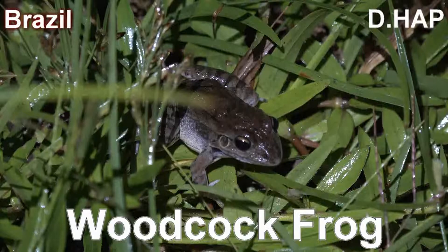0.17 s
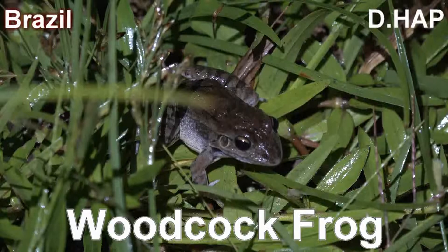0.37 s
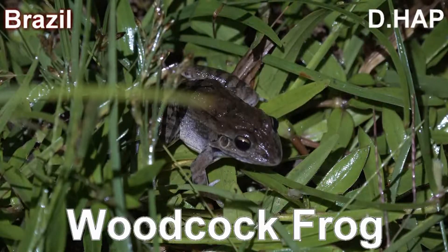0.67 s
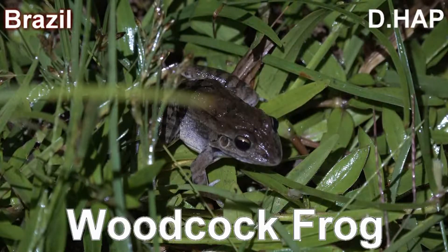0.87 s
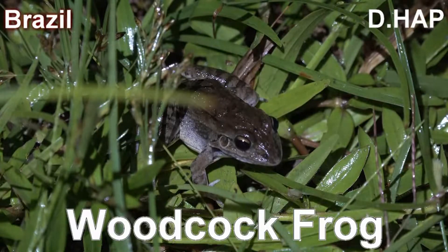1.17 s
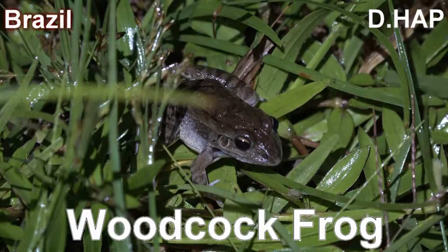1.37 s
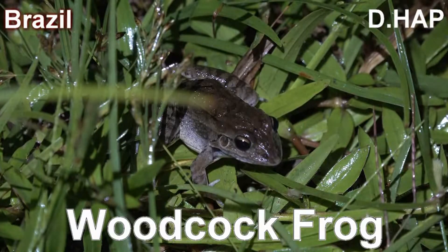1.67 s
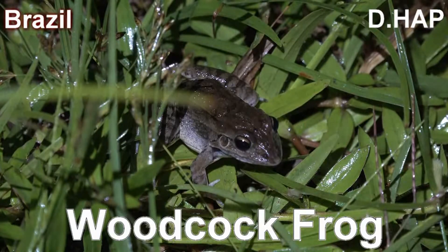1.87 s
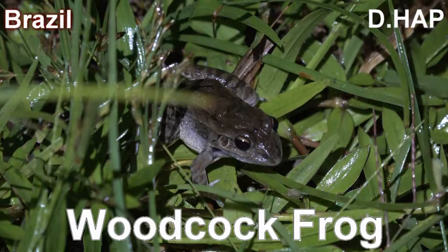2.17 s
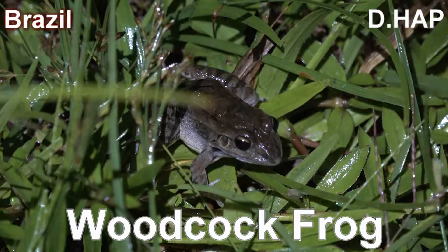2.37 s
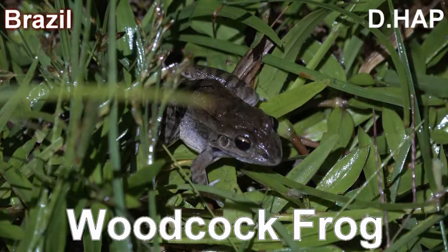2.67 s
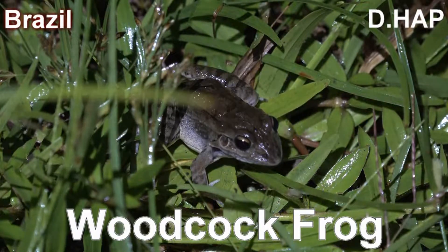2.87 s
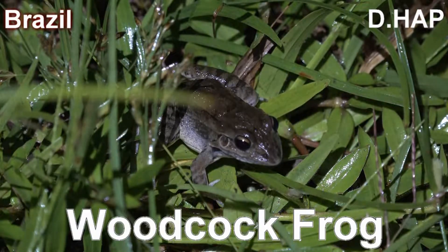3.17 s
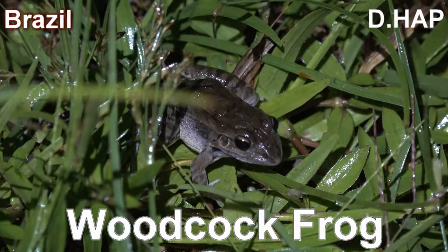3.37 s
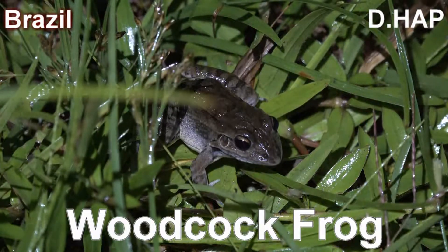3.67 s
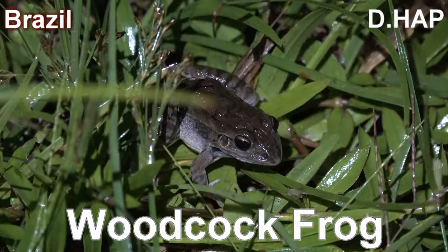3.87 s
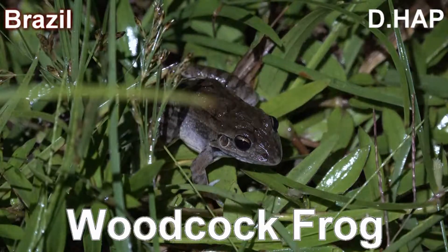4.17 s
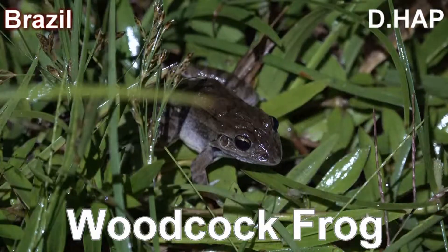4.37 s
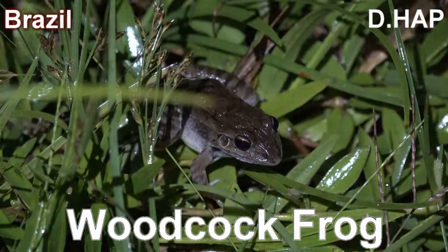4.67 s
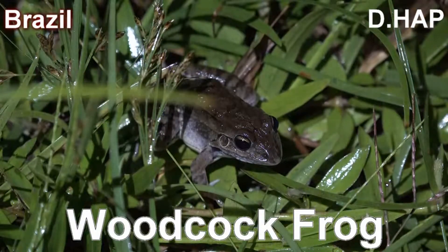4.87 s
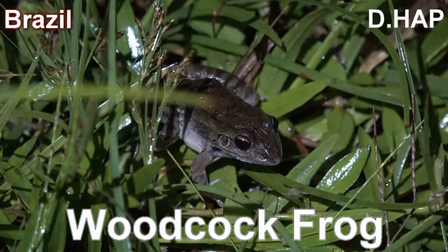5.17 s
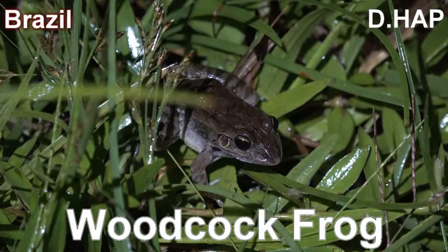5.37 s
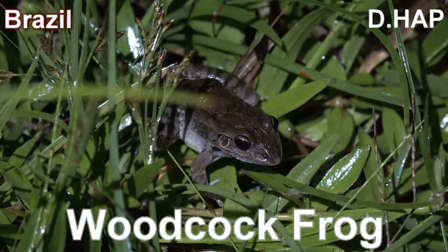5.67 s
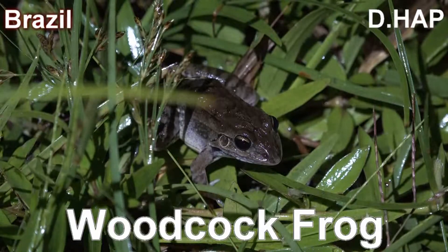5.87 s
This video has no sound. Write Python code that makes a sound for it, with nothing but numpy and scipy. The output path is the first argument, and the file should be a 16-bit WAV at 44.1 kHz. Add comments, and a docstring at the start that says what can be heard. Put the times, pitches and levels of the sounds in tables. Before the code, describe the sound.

Two quick upward frog whistles poke through a steady shimmering wall of crickets and katydids in night grass, with faint frogs far behind.

```python
"""Frog and insects in night grass

A frog, a little right of centre in stereo, gives two short rising whistles: swept sines notched by the ground.
Crickets trill in phrases and chirp as tone bursts; a bush cricket buzzes as a comb of overtones.
Two katydids rasp as gated noise; far frogs, a hoarse call and soft hoots are resonances driven by noise.
Behind them lie far crickets, a traffic murmur, mains hum and the hiss of the night."""
import sys
import numpy as np
from scipy import signal
from scipy.fft import rfft, irfft, next_fast_len
from scipy.io import wavfile

SR = 44100
rng = np.random.default_rng(int(sys.argv[2]) if len(sys.argv) > 2 else 0)


def bounce(signal):
    """Save signal as a 16-bit WAV file at the path given by the first command-line argument."""
    frames = np.transpose(np.atleast_2d(signal))
    limited = np.clip(frames, -1, 1)
    pcm = np.round(limited * 32767).astype(np.int16)
    wavfile.write(sys.argv[1], SR, pcm)


def attenuation_scalar(level_db):
    """Turn a level in dB into a linear amplitude multiplier (20 dB per decade)."""
    decades = np.asarray(level_db, float) / 20
    return 10 ** decades


N = 265923
PADDED = next_fast_len(N)  # length of the long transforms


def evened(x):
    """Normalisation: scales to rms 1."""
    return x / np.sqrt(np.mean(x ** 2) + 1e-20)


def curve(rows):
    """Linear interpolation: the columns after t, read at every sample."""
    s, *columns = np.transpose(rows)
    return [np.interp(np.arange(N) / SR, s, c) for c in columns]


def sine(hz):
    """Frequency modulation: phase is the running sum of frequency; peak 1."""
    return np.sin(2 * np.pi * np.cumsum(hz) / SR)


def wander(top_hz, count=24):
    """Slow fluctuation: a sum of sines of random phase, up to top_hz, rms 1."""
    t = np.arange(0, N + 256, 256) / SR
    rates = np.geomspace(top_hz / 20, top_hz, count)
    slow = sum(np.sin(2 * np.pi * (f * t + rng.random())) / np.sqrt(f) for f in rates)
    return np.interp(np.arange(N) / SR, t, evened(slow))


def resonate(x, hz, width):
    """Resonance: a double pole; for a moving one, hz is shifted to zero, smoothed twice and shifted back."""
    r = np.exp(-np.pi * width / SR)
    if np.isscalar(hz):
        pole = r * np.exp(2j * np.pi * hz / SR)
        return 2 * signal.lfilter([(1 - r) ** 2], [1, -2 * pole, pole * pole], x).real
    turn = np.exp(2j * np.pi * np.cumsum(hz) / SR)
    smooth = signal.lfilter([(1 - r) ** 2], [1, -2 * r, r * r], x * turn.conj())
    return 2 * (turn * smooth).real


def pair(same):
    """Interchannel coherence: two channels of noise with the correlation given."""
    a, b = rng.standard_normal((2, N))
    same = np.clip(same, -1, 1)
    return np.array([a, same * a + np.sqrt(1 - same ** 2) * b])


def coloured(x, points, lag=0.):
    """Spectral filtering: multiplies by the curve of points; the right channel arrives lag ms later."""
    hz = np.fft.rfftfreq(PADDED, 1 / SR)
    f, db = np.transpose(points)
    gain = attenuation_scalar(np.interp(np.log(hz + 1), np.log(f), db, left=-90, right=-90))
    late = np.exp(-2j * np.pi * hz * np.array([[0], [lag / 1000]]))
    return irfft(rfft(x, PADDED) * gain * late, PADDED)[:, :N]


def scatter(x, t60, same):
    """Multiple scattering by leaves and ground: convolution with a dying noise tail, left energy 1."""
    t = np.arange(round(SR * .4)) / SR
    tail = pair(same)[:, :len(t)] * attenuation_scalar(-60 * t / t60) * (t > .004)
    return signal.fftconvolve(x[None], tail / np.linalg.norm(tail[0]), axes=1)[:, :N]


def bouts(rows, rise_db_per_s, drift_db_per_s, fall_db_per_s, rest_db):
    """Exponential envelope: gain climbs to each row's level, drifts while it lasts and falls to rest."""
    t, db = np.arange(0, N + 64, 64) / SR, rest_db
    for start, stop, top_db in rows:
        rise = rise_db_per_s * np.minimum(t - start, 0)
        drift = drift_db_per_s * (np.clip(t, start, stop) - start)
        fall = fall_db_per_s * np.maximum(t - stop, 0)
        db = np.maximum(db, top_db + rise + drift - fall)
    return np.interp(np.arange(N) / SR, t, attenuation_scalar(db))


def between(start, stop, edge_s):
    """Gating: 0 outside the span, 1 inside, with linear edges centred on its ends."""
    t = np.arange(N) / SR
    return np.clip(np.minimum(t - start, stop - t) / edge_s + .5, 0, 1)


# the frog's whistles, levels ahead of panning and notches: start t/s, top level/dB
WHISTLES = [(3.698, -32), (4.787, -32)]
# the sweep of every whistle: t/s after its start, f/Hz, level/dB re top
WHISTLE_SWEEP = [(0, 950, -28), (.019, 1050, -23), (.03, 1150, -4.5), (.04, 1325, -3.5), (.047, 1515, -4),
                 (.057, 1665, -3.5), (.07, 1835, 0), (.088, 2110, -3), (.096, 2280, -18), (.106, 2400, -25)]
# notches where the ground reflection cancels the frog: f/Hz, width/Hz,
# share of the band subtracted left, right (1 cancels, more inverts)
GROUND_NOTCHES = [(1400, 70, 1.25, 1.25), (2010, 90, .8, .5)]


def frog():
    """Interference: a rising sine notched by its ground reflection, with one late echo and a faint tail."""
    t, voice = np.arange(N) / SR, np.zeros(N)
    for start, top_db in WHISTLES:
        hz, db = curve(np.add(WHISTLE_SWEEP, (start, 0, top_db)))
        sounding = (t > start) & (t < start + WHISTLE_SWEEP[-1][0])
        voice += np.sqrt(2) * attenuation_scalar(db) * sounding * sine(hz * sounding)
    near = np.array([voice, np.roll(voice, 2)])  # the right channel lags by two samples
    for hz, width, left, right in GROUND_NOTCHES:
        band = signal.lfilter(*signal.iirpeak(hz, hz / width, SR), near)
        near = near - np.array([[left], [right]]) * band
    echo = attenuation_scalar(-30) * np.roll(voice, round(.05 * SR))
    return near * attenuation_scalar([[-1.8], [1.6]]) + echo + attenuation_scalar(-21) * scatter(voice, 0.55, 0.47)


# phrases of the trilling cricket, levels ahead of the direct and scattered mix:
# start t/s, full pitch t/s, stop t/s, level/dB
TRILL_PHRASES = [(-.75, -.4, .27, -37), (1.06, 1.41, 2.095, -38.5), (2.772, 3.08, 3.77, -37.5),
                 (4.516, 4.8, 5.455, -38.5)]
TRILL_RATE = 49.3  # pulses per second
TRILL_LOW_HZ, TRILL_TOP_HZ, SLIDE_BEND = 5430, 5905, 1.15  # slide of the mean pitch; exponent of its curve
SWELL_DB = -8.5  # at the start of a phrase, re its full level
AFTER_HZ, AFTER_DB, AFTER_DB_PER_S = 5852, -5.5, -18  # lingering shimmer: pitch, level re phrase, decay


def trill():
    """Stridulation: each wing stroke is a tone burst falling in pitch; scattering in the grass smears it."""
    t, (hz, gain, beat, after) = np.arange(N) / SR, np.zeros((4, N))
    for start, full, stop, db in TRILL_PHRASES:
        on = t >= start
        slide = np.clip((t - start) / (full - start), 0, 1) ** SLIDE_BEND
        hz[on] = (TRILL_LOW_HZ + (TRILL_TOP_HZ - TRILL_LOW_HZ) * slide)[on]
        beat[on] = TRILL_RATE * (t[on] - start)
        gain += attenuation_scalar(db + SWELL_DB * (1 - slide)) * between(start, stop, 0.011)
        decay_db = AFTER_DB_PER_S * np.maximum(t - stop, 0)
        after += attenuation_scalar(db + AFTER_DB + decay_db) * between(full, stop + 2, 0.25)
    stroke = np.clip((beat + .04 * wander(6)) % 1 / 0.74, 0, 1)  # the burst fills 0.74 of each period
    gate = np.sin(np.pi * stroke ** 0.55) ** 2
    rough = evened(resonate(rng.standard_normal(N), hz, 520)) * gate
    fall_hz = 460 * (.5 - stroke) * (stroke < 1)
    clean = sine(hz + fall_hz + 20 * wander(30)) * gate
    song = gain * evened(.75 * evened(clean) + .33 * evened(rough))
    shimmer = after * evened(resonate(pair(0.76), AFTER_HZ, 210))
    return .75 * song * attenuation_scalar([[-.5], [.5]]) + .4 * scatter(song, .15, .6) + shimmer


def overtones(rate, orders, fade_db, turn):
    """Fourier series: regular wing strokes are a comb; moving air lets each line fade and shift alone."""
    angle, out = 2 * np.pi * np.cumsum(rate) / SR, np.zeros((2, N))
    for k, db in orders:
        drift = 1.0 * wander(14, count=8) + rng.normal(0, 0.91)
        sides = np.array([[turn], [-turn]]) * rng.uniform(0.48, 1.53)  # phase left, right [rad]
        line_gain = attenuation_scalar(db + fade_db * wander(20, count=8)) * np.sqrt(2)
        out += line_gain * np.cos(round(k) * angle + drift + sides)
    return out


# the bush cricket's buzz: t/s, mean f/Hz of overtone 45 of the wing rate, rms level/dB
BUZZ = [(.15, 7033, -41), (3.0, 7031, -41), (6.05, 7028, -40.5)]
# its overtones: multiple of the wing rate, relative level/dB
BUZZ_ORDERS = [(36, -13), (37, -20), (38, -9), (39, -14), (40, -15), (41, -13), (42, -7), (43, -5), (44, 0),
               (45, 0), (46, -6), (47, -9), (48, -10), (49, -14), (50, -14), (51, -18)]


def bush_cricket():
    """Harmonic comb: a nearly steady wing rate yields high overtones only."""
    hz, db = curve(BUZZ)
    rate = (hz + 4 * wander(4)) / 45
    return attenuation_scalar(db) * evened(overtones(rate, BUZZ_ORDERS, 1.8, .35))


# thin tones of other singers, ahead of their waver and fading: f/Hz, rms level/dB
THIN_TONES = [(6640, -62), (6805, -58), (7120, -65), (7291, -58), (7432, -55), (7596, -59), (7905, -71)]
THIN_WAVER = 6.63  # rms waver of pitch [Hz]


def thin_tones():
    """Random modulation: sines that waver in pitch and level, out of phase between the channels."""
    out = np.zeros((2, N))
    for hz, db in THIN_TONES:
        angle = 2 * np.pi * np.cumsum(hz + THIN_WAVER * wander(10, count=8)) / SR
        gain = attenuation_scalar(db + 5.9 * wander(11, count=8)) * np.sqrt(2)
        out += gain * np.cos(angle + np.array([[.5], [-.5]]))
    return out


# tempo of the katydid at the side, a stroke at every whole number: t/s, strokes so far
SIDE_TEMPO = [(0, .71), (.8, 13.36), (1.05, 17.39), (2.05, 33.84), (2.8, 45.71), (3.3, 53.98),
              (4.05, 65.86), (4.55, 73.42), (4.8, 77.34), (5.05, 81.45), (6.05, 97.17)]
# tempo of the katydid in front: t/s, strokes so far
FRONT_TEMPO = [(0, .47), (1.55, 26.9), (2.3, 39.98), (2.8, 47.56), (4.15, 70.7), (6.05, 102.9)]
# spectrum of the one at the side: f/Hz, relative level/dB
SIDE_RASP = [(6500, -31), (7600, 2.5), (8600, 0.5), (9400, -7.5), (10700, -6.5), (12000, -7.5),
             (13500, -14), (15000, -23), (16000, -43)]
# spectrum of the one in front: f/Hz, relative level/dB
FRONT_RASP = [(6500, -28), (7500, 3), (8900, -1), (10000, -5.5), (11000, -11.5), (12500, -14),
              (15000, -11.5), (16000, -30)]
# spectrum of the far katydids: f/Hz, relative level/dB
FAR_RASP = [(6500, -35), (7600, -15), (8600, 2.5), (9400, 0), (10700, -5), (12000, -8.5), (13500, -8.5),
            (15000, -22), (16000, -10.5)]
# the far katydids, ahead of the common 2 dB lift: t/s, rms level/dB
RASP_BED = [(.15, -43), (.6, -47), (3.0, -44.5), (6.05, -43.5)]


def strokes(tempo):
    """Amplitude modulation: power of a rasp, a Gaussian pulse of varying size at each whole number."""
    count = curve(tempo)[0]
    nearest = np.round(count)
    size = attenuation_scalar(1.2 * rng.standard_normal(200))[nearest.astype(int)]
    offset_s = (count - nearest) / np.gradient(count) / SR
    return size * np.exp(-(offset_s / 0.0097) ** 2)


def katydids():
    """File and scraper: each stroke gates fine broadband clicks over the steady rasp of those far away."""
    side, blur = strokes(SIDE_TEMPO), between(1, 1.94, .15)  # span in which the strokes run together
    side = (1 - blur) * side + blur * side.mean()
    front = strokes(FRONT_TEMPO) * (1 - between(2.33, 2.81, 0.072))  # the one in front rests
    teeth = attenuation_scalar(2.8 * rng.standard_normal((2, N // 20 + 1))).repeat(20, axis=1)[:, :N]
    side_noise = evened(coloured(pair(0.87) * teeth[0], SIDE_RASP, lag=-0.061))
    front_noise = evened(coloured(pair(0.44) * teeth[1], FRONT_RASP))
    aside = attenuation_scalar(-40) * side_noise * np.sqrt(side)
    ahead = attenuation_scalar(-42.5) * front_noise * np.sqrt(front)
    bed = evened(coloured(pair(0.46), FAR_RASP, lag=-0.065)) * attenuation_scalar(curve(RASP_BED)[0])
    return attenuation_scalar(2.0) * (aside * attenuation_scalar([[-.6], [.6]]) + ahead + bed)


# bouts of chirps, levels ahead of a 5 dB cut, panning and chance: first t/s, last t/s, level/dB
CHIRP_BOUTS = [(.653, .941, -44), (3.089, 3.233, -45), (4.508, 4.797, -47)]
CHIRP_GAP_S, CHIRP_HZ = .072, 4875  # spacing; the pitch a chirp approaches


def chirps():
    """Onset transient: short tones start flat and rise exponentially to pitch."""
    t, out = np.arange(round(.039 * SR)) / SR, np.zeros((2, N))
    tone = sine(CHIRP_HZ - 130 * np.exp(-t / .012)) * signal.windows.tukey(len(t), .35)
    pan_db = np.array([[-1.5], [1.5]])
    for first, last, db in CHIRP_BOUTS:
        for s in np.linspace(first, last, round((last - first) / CHIRP_GAP_S) + 1):
            out[:, round(s * SR):][:, :len(t)] += attenuation_scalar(db - 5.0 + 1.1 * rng.normal() + pan_db) * tone
    return out + 0.11 * scatter(out.mean(0), 0.085, 0.36)


# the same kind of frog further off, levels ahead of the direct and scattered mix:
# t/s, length/s, first f/Hz, highest f/Hz, level/dB
FAR_WHISTLES = [(.585, .14, 1700, 2240, -55.5), (4.62, .12, 1900, 2450, -60), (5.3, .16, 2150, 2450, -59)]
FAR_ARCH = .74  # share of a half turn that a far whistle's pitch runs through


def far_whistles():
    """Diffuse propagation: arched whistles blurred by scattering almost as strong as the direct sound."""
    t, voice = np.arange(N) / SR, np.zeros(N)
    for s, length, first_hz, top_hz, db in FAR_WHISTLES:
        u = np.clip((t - s) / length, 0, 1)
        hz = first_hz + (top_hz - first_hz) * np.sin(np.pi * FAR_ARCH * u)
        voice += attenuation_scalar(db) * np.sqrt(np.abs(np.sin(np.pi * u))) * (u < 1) * sine(hz)
    return 0.85 * voice + 0.79 * scatter(voice, 0.19, 0.89)


# bouts of the far chorus: full from t/s, until t/s, level/dB at the start
CHORUS = [(.1, .35, -59), (1.2, 2.12, -59.5), (2.95, 3.75, -58.5), (4.41, 5.15, -58), (5.3, 6.1, -59)]
# resonances of its throats: f/Hz, width/Hz, relative level/dB
CHORUS_THROAT = [(1985, 150, 0), (1860, 170, -5), (2300, 300, -10)]
CROAKS_PER_S, CROAK_DEPTH = 23, .25  # mean rate and depth of the throb
LEAD_HZ, LEAD_SHARE = 2000, .85  # one clearer voice: mean pitch, rms re the rest


def frog_chorus():
    """Source and filter: random croak pulses and noise ring in throats, and the whole throbs."""
    t = np.arange(N) / SR
    pulses = (rng.random(N) < 300 / SR) * rng.standard_normal(N)
    drive = 0.46 * evened(scatter(pulses, 0.17, 0.98)) + .5 * pair(0.63)
    chorus = sum(attenuation_scalar(db) * resonate(drive, hz, width) for hz, width, db in CHORUS_THROAT)
    lead = np.sqrt(2) * sine(LEAD_HZ + 28 * wander(40))
    throb = 1 + CROAK_DEPTH * np.sin(2 * np.pi * (CROAKS_PER_S * t + 0.33 * wander(4)))
    chorus = (evened(chorus) + LEAD_SHARE * lead) * throb
    return bouts(CHORUS, 100, 1.4, 170, -76) * evened(chorus)


# the hoarse far call: full from t/s, until t/s, level/dB at the start
HOARSE = [(2.27, 2.45, -54)]
# resonances of its throat: f/Hz, width/Hz, relative level/dB
HOARSE_THROAT = [(622.6, 30, 2.5), (753, 60, 0), (970, 170, 3), (1128, 130, 3)]


def hoarse_call():
    """Source and filter: noise through the resonances of a rough throat."""
    drive = pair(0.44)
    throat = sum(attenuation_scalar(db) * resonate(drive, hz, width) for hz, width, db in HOARSE_THROAT)
    return bouts(HOARSE, 260, -31, 200, -110) * evened(throat)


# faint low hoots and brief hissy swells: t/s, length/s, f/Hz, width/Hz, rms level/dB at the crest
HOOTS = [(.2, 0.33, 476, 25, -73), (1.37, 0.33, 475, 27, -73), (3.602, 0.38, 474, 24, -72),
         (2.66, 0.16, 4500, 730, -53.5), (4.82, 0.16, 4400, 1300, -49.5)]


def hoots_and_swells():
    """Narrowband noise: resonated noise under a half-sine envelope."""
    t, out = np.arange(N) / SR, np.zeros(N)
    for s, length, hz, width, db in HOOTS:
        swell = np.sin(np.pi * np.clip((t - s) / length, 0, 1))
        out += attenuation_scalar(db) * swell * evened(resonate(rng.standard_normal(N), hz, width))
    return out


# the many far crickets that blur into bands, ahead of a slow shimmer: f/Hz, width/Hz, rms level/dB
FAR_CRICKETS = [(3580, 750, -55), (5475, 55, -57), (5600, 80, -54), (5890, 290, -50.5), (6320, 410, -47.5),
                (6790, 650, -42.5), (7227, 830, -42), (1031, 133, -70.5), (801, 86, -74)]


def far_crickets():
    """Incoherent summation: many singers merge into bands of noise that shimmer slowly."""
    out = np.zeros((2, N))
    for hz, width, db in FAR_CRICKETS:
        shimmer_db = .7 * wander(12)
        out += attenuation_scalar(db + shimmer_db) * evened(resonate(pair(0.75), hz, width))
    return out


# swells of the traffic murmur: full from t/s, until t/s, level/dB at the start
RUMBLE = [(2.0, 2.45, -62.5), (4.45, 5.19, -63)]


def traffic_murmur():
    """Band-limited noise: one broad low resonance that swells and sinks."""
    return bouts(RUMBLE, 70, -4.5, 35, -72.5) * evened(resonate(pair(0.32), 315, 224))


# mains hum, ahead of its waver: f/Hz, rms level/dB
HUM = [(57.5, -72), (118.6, -65), (242.2, -77.5)]


def mains_hum():
    """Additive synthesis: low sines wavering a little in pitch and level."""
    out = np.zeros(N)
    for hz, db in HUM:
        out += attenuation_scalar(db + 0.99 * wander(5)) * np.sqrt(2) * sine(hz + 2.0 * wander(6))
    return out


# coherence of the hiss: f/Hz, left-right correlation (negative is opposed)
HISS_LIKENESS = [(60, 0.81), (92, 0.81), (140, 0.56), (210, 0.49), (330, -0.78), (500, -0.57), (770, -0.78),
                 (1170, -0.37), (1790, -0.12), (2740, 0.83), (4190, 0.85), (6410, 1), (9810, -0.25),
                 (15000, 0.4)]
# spectrum of the hiss: f/Hz, relative level/dB per Hz
HISS_SPECTRUM = [(15, -46), (25, -15), (50, -9), (74, -9.5), (119, -13.5), (169, -11.5), (242, -12),
                 (296, -15), (688, -10), (1370, -14), (1960, -9), (2800, -10.5), (3650, -3.5), (4950, -7),
                 (5150, -10), (6000, -35)]


def night_hiss():
    """Frequency-dependent coherence: shaped noise whose channels agree more or less with pitch."""
    f, same = np.transpose(HISS_LIKENESS)
    log_hz = np.log(np.fft.rfftfreq(PADDED, 1 / SR) + 1)
    same = np.clip(np.interp(log_hz, np.log(f), same), -1, 1)
    a, b = rfft(rng.standard_normal((2, PADDED)))
    noise = irfft(np.array([a, same * a + np.sqrt(1 - same ** 2) * b]), PADDED)
    return attenuation_scalar(-51) * evened(coloured(noise, HISS_SPECTRUM))


def scene():
    """Superposition: all sources add; cricket wings radiate little below their lowest note."""
    radiation = signal.butter(8, 5290, "high", fs=SR, output="sos")
    wings = signal.sosfilt(radiation, trill() + bush_cricket() + thin_tones())
    singers = frog() + wings + katydids() + chirps() + far_whistles() + frog_chorus()
    distance = hoarse_call() + hoots_and_swells() + far_crickets()
    return singers + distance + traffic_murmur() + mains_hum() + night_hiss()


def top_cut(x):
    """Nothing passes above the cut-off."""
    return signal.sosfilt(signal.butter(12, 16430, fs=SR, output="sos"), x)


def record(dry):
    """Onset ramp: silence until 0.1575 s, then a linear fade-in of 1 ms."""
    fade = np.clip((np.arange(N) / SR - .1575) / .001, 0, 1)
    return top_cut(dry * fade)


dry = scene()
out = record(dry)
bounce(out)
```